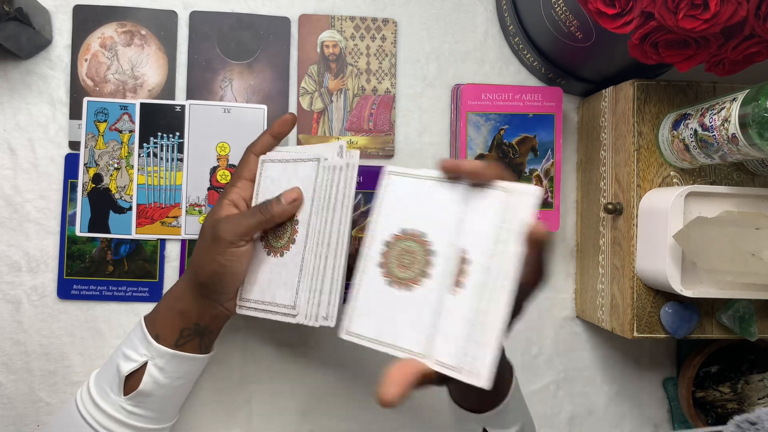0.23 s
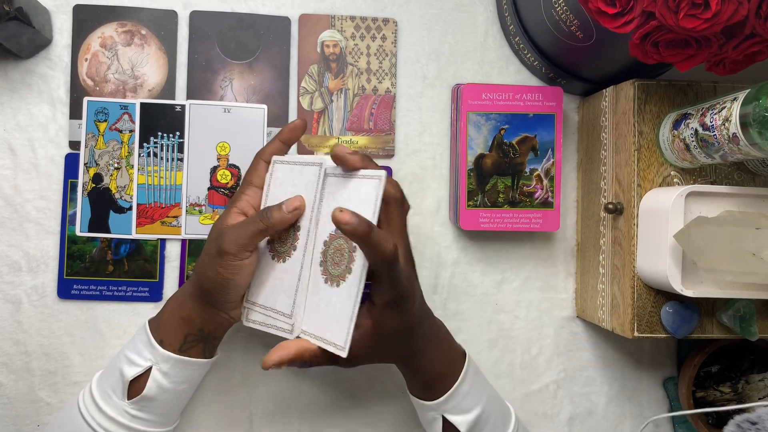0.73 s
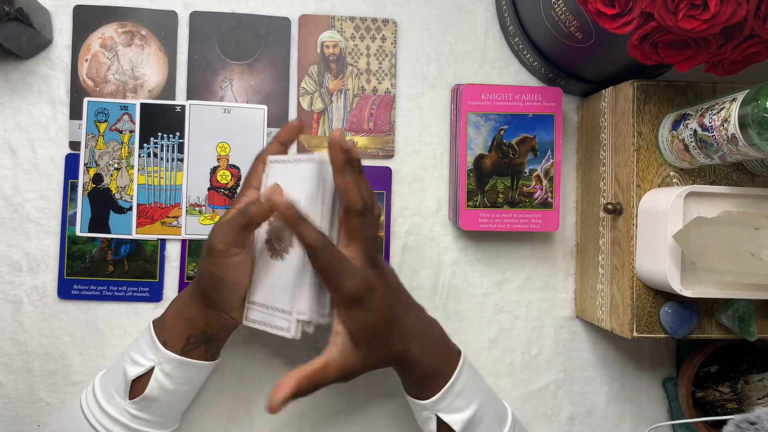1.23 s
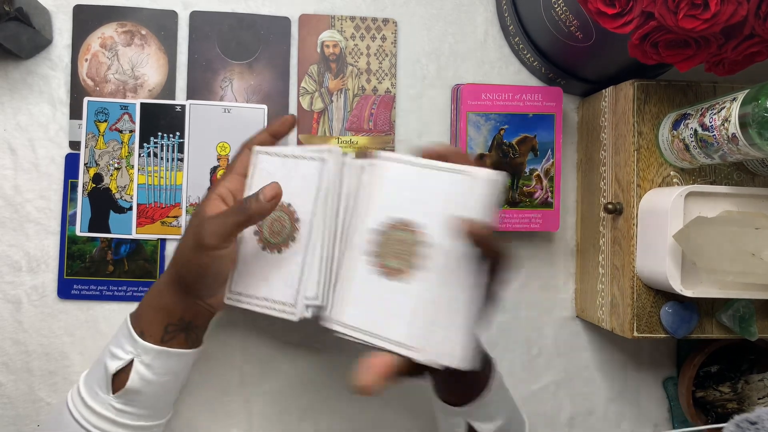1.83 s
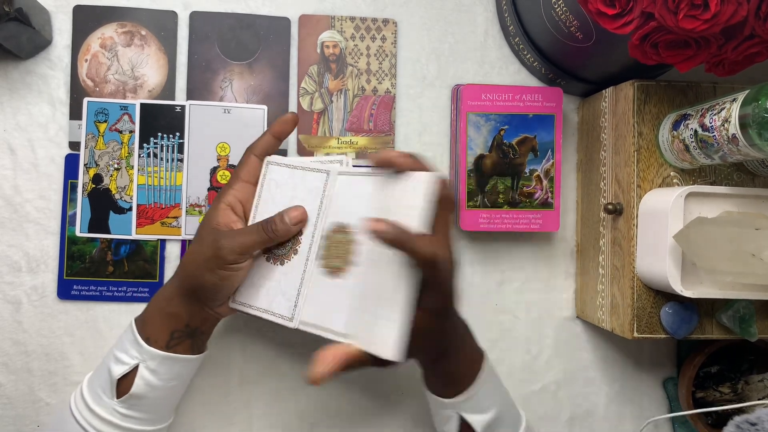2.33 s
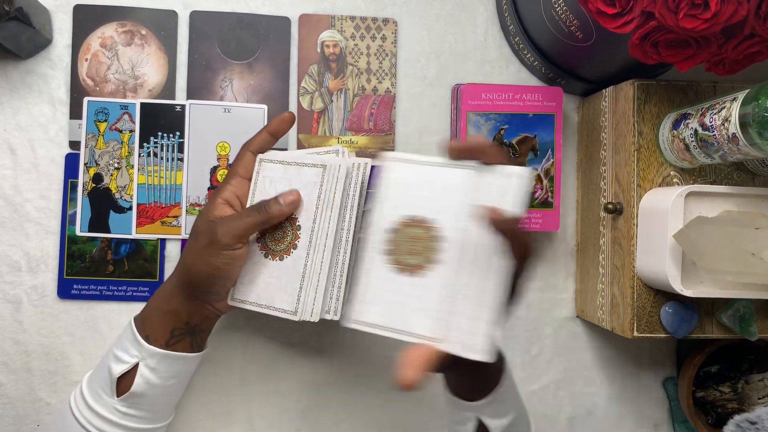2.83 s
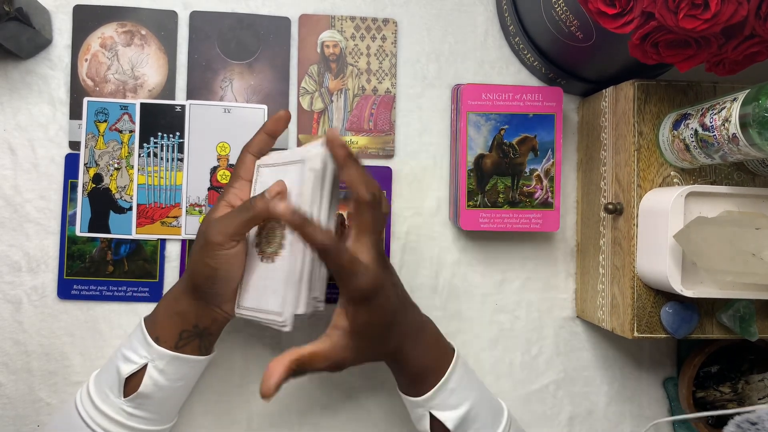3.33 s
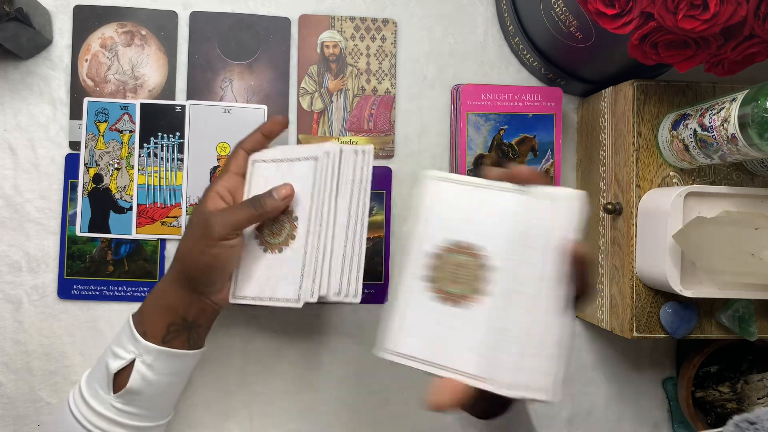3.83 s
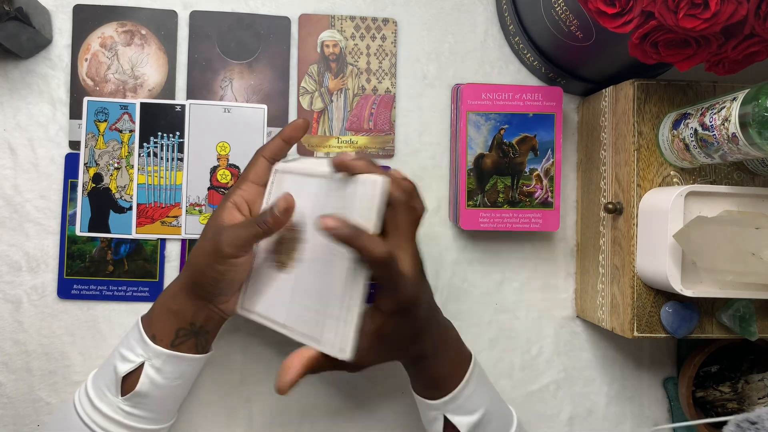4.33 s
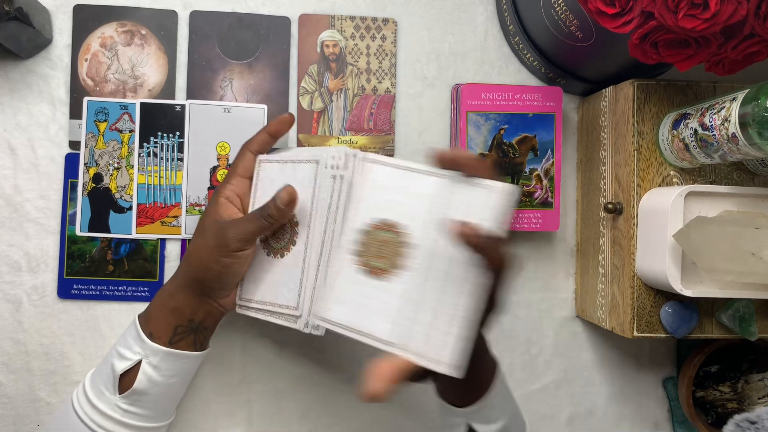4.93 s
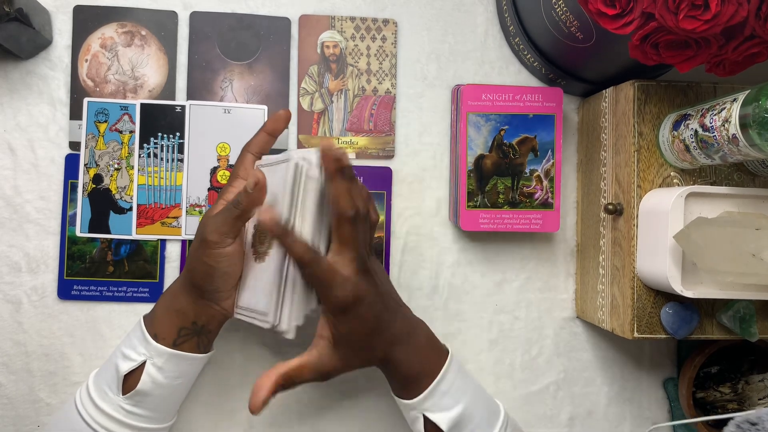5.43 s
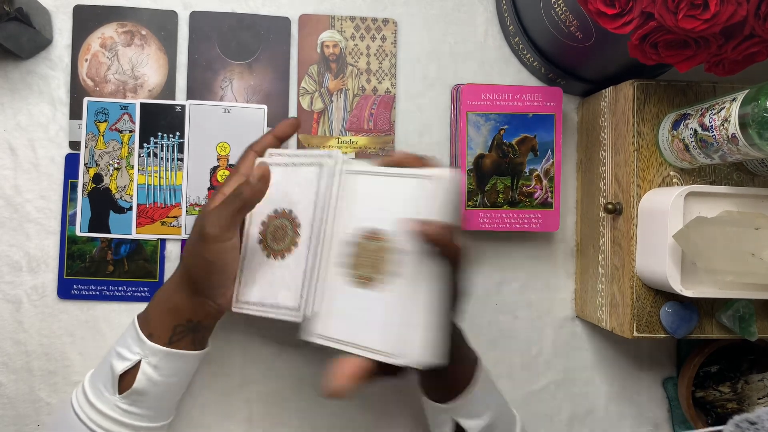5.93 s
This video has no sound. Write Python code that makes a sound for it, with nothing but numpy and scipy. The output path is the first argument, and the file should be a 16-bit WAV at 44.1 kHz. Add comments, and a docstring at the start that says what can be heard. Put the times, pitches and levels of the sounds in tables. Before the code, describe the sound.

One nearby microphone picks up hands shuffling stiff cards over a cloth-covered table. Crisp snaps and softer flicks come irregularly, a few strong ones standing out, with short papery rubbing as the cards are gathered and squared. Very soft low thumps come from the table. The room is quiet, with short reflections, a gentle steady rumble and a trace of electrical hum.

```python
"""A soft room rumble and a faint mains hum come first, then cards: a big deck is shuffled overhand above a cloth.
Packets clack against the deck: flattened clusters of contacts ring its resonances, with a dull puff and a crackle.
Faces slide over each other as filtered friction noise, and single edges flick and tick.
Now and then a nudge makes the table boom in decaying sines; short reflections put the cards in a quiet room."""
import sys
import numpy as np
from scipy import signal
from scipy.fft import rfft, irfft, next_fast_len
from scipy.io import wavfile
from scipy.ndimage import uniform_filter1d

SR = 44100
rng = np.random.default_rng(int(sys.argv[2]) if len(sys.argv) > 2 else 0)


def unload_wav(signal):
    """Save mono or channel-first audio to the path in sys.argv[1] as 16-bit WAV at rate SR, clipped to [-1, 1]."""
    wavfile.write(
        sys.argv[1],
        SR,
        np.round(np.clip(np.atleast_2d(signal).T, -1, 1) * 32767).astype(np.int16),
    )


N = 272538
TIME = np.arange(N) / SR


def from_db(db):
    """Decibels to gain."""
    return 10 ** (np.asarray(db) / 20)


def rms_one(x):
    """Scale to unit power."""
    return x / np.sqrt(np.mean(x ** 2) + 1e-20)


def add(track, start_s, sound):
    """Mix a sound into a track at a time."""
    at = max(round(start_s * SR), 0)
    track[at:at + len(sound)] += sound[:max(N - at, 0)]


def lowpass(x, order, hz):
    """Butterworth low-pass that dulls a sound."""
    return signal.sosfilt(signal.butter(order, hz, fs=SR, output="sos"), x)


def resonate(x, hz, width_hz):
    """Two-pole resonance with gain 1 on top; a wider one dies away sooner."""
    radius = np.exp(-np.pi * width_hz / SR)
    zeros = np.array([1, 0, -1]) * (1 - radius * radius) / 2
    poles = [1, -2 * radius * np.cos(2 * np.pi * hz / SR), radius * radius]
    return signal.lfilter(zeros, poles, x)


def colour(x, spectrum):
    """Minimum-phase filter through (pitch_hz, level_db) points, so that nothing sounds early."""
    size = next_fast_len(len(x) + 1024, True)
    hz, db = np.transpose(spectrum)
    grid = np.maximum(np.arange(size // 2 + 1) * SR / size, 1)
    gain = from_db(np.interp(np.log(grid), np.log(hz), db))
    # folding the cepstrum onto positive times makes the phase minimal
    cepstrum = irfft(np.log(gain), size)
    cepstrum[1:size // 2] *= 2
    cepstrum[size // 2 + 1:] = 0
    return irfft(rfft(x, size) * np.exp(rfft(cepstrum)), size)[:len(x)]


# spectral shape of the room's rumble and hiss: (pitch_hz, relative_density_db)
ROOM_TONE = [(20, -2), (42, -17), (60, 6.5), (95, -8), (160, -2.5), (290, 3.5), (430, -1.5), (650, -9.5),
             (1050, -15), (2500, -17), (4500, -21), (7500, -23), (11000, -29), (16000, -35.5)]
ROOM_TONE_DB = -57.5  # rms
# mains hum partials: (pitch_hz, level_db), levels rms
HUM = [(120, -73), (240, -67.5)]


def background():
    """Steady room rumble and hiss from coloured noise, with a faint mains hum of sines."""
    tone = rms_one(colour(rng.standard_normal(N), ROOM_TONE))
    hum = sum(from_db(db) * np.sqrt(2) * np.sin(2 * np.pi * (hz * TIME + rng.random())) for hz, db in HUM)
    return from_db(ROOM_TONE_DB) * tone + hum


def drift(knots_per_s):
    """Random wandering in straight lines between knots, scaled to unit power."""
    knots = rng.standard_normal(8192)
    return rms_one(np.interp(TIME * knots_per_s, np.arange(len(knots)), knots))


def friction(catches_per_s=450, catch_share=0.2, catch_vary_db=3.5, judder_db=3.0, judder_rate=170):
    """Card on card: a smooth hiss plus tiny catches, under an unsteady finger pressure."""
    sizes = from_db(catch_vary_db * np.minimum(rng.exponential(1, N), 4)) * rng.choice([-1, 1], N)
    catches = rms_one(sizes * (rng.random(N) < catches_per_s / SR))
    hiss = rng.standard_normal(N)
    return (hiss + catch_share * catches) * from_db(judder_db * drift(judder_rate))


def pressure(start, end, rise_s, fall_s):
    """The samples of one rub, and its finger pressure: attack, hold and release."""
    span = slice(max(round(start * SR), 0), round(max(end, start + .005) * SR))
    t = TIME[span]
    return span, np.clip(np.minimum((t - start) / rise_s, (end - t) / fall_s), 0, 1)


# overhand strokes, each a packet that lands, is dragged off the deck and lets go with a light flick:
# (landing_s, release_s, clack_db, thud_over_clack_db, crispness_over_clack_db, contact_spread_s,
#  table_bounce_lag_s, release_clack_db, drag_db), levels before the overall trims
STROKES = [(0.0534, 0.1277, -43.5, -4.5, -2.5, 0.006, 0.00024, -51.5, -61),
           (0.3736, 0.4725, -24, -13, -6.5, .0017, .00054, -51, -69),
           (.856, .887, -38, -2.5, -9, 0.0026, 0.001, -50, -73),
           (1.8568, 1.965, -40.5, -1, -16, 0.0017, .00025, -46.5, -58.5),
           (2.2078, 2.2874, -36, -9.5, -18, .0003, 0.00044, -54, -59),
           (2.5344, 2.641, -26.5, -4.5, -10, 0.00072, .00061, -45.5, -57),
           (2.8689, 2.9416, -30, -10, -7.5, 0.00076, 0.00065, -45, -56.5),
           (3.16, 3.214, -19.5, -21, -9, 0.0017, 0.0012, -45.5, -56.5),
           (3.95, 4.0444, -32.5, -8.5, -17, .00046, 0.00051, -48.5, -59.5),
           (4.2762, 4.3735, -35, -25, -12.5, 0.0015, .00051, -46.5, -61),
           (5.0231, 5.081, -39.5, -7.5, -10.5, 0.0023, 0.00034, -45, -61),
           (5.2739, 5.305, -31, -4, -7, .0028, 0.0012, -58, -52),
           (5.71, 5.732, -49.5, 3, -6, 0.0015, .0002, -44, -57),
           (5.9507, 6.0344, -38.5, 0, -4.5, 0.00031, .00047, -45, -68)]
# the packet skims the deck just before it lands and just after it lets go
SKIM_S, LINGER_S = 0.0086, 0.01
# the drag grows by this much towards the release
DRAG_GROWTH_DB, DRAG_TREBLE_DB, DRAG_RING_HZ = 3.5, 0.5, 1750
# card faces sliding while the deck is cut and squared:
# (start_s, end_s, level_db, treble_over_body_db, card_resonance_hz), levels before the overall trims
SLIDES = [(0.36, 0.386, -38.5, -23, 3920), (0.466, .487, -55, 5.5, 5700), (0.725, 0.794, -58, -6, 1700),
          (.846, 0.871, -53.5, -5.5, 1780), (0.995, 1.067, -55.5, -7, 7340), (1.069, 1.11, -51, -3.5, 5076),
          (1.105, 1.189, -49.5, -18, 3930), (1.235, 1.311, -63.5, 6.5, 5610), (1.311, 1.624, -69, 1, 7940),
          (1.482, 1.743, -65, -13, 2223), (2.281, 2.297, -48.5, -17, 3020), (3.266, 3.307, -60, 1, 7100),
          (3.361, 3.401, -55, 3.5, 7430), (3.4, 3.474, -59.5, 1.5, 5300), (3.526, 3.745, -67.5, 0, 7700),
          (3.924, 3.974, -54.5, -4, 3700), (4.315, 4.371, -49, -25, 1600), (4.588, 4.743, -58, -1.5, 1530),
          (4.965, 4.996, -51.5, -6, 6370), (5.187, 5.383, -55, -3, 1900), (5.426, 5.522, -61, 5.5, 5420),
          (5.541, 5.66, -70.5, 0, 6200), (5.64, 5.705, -61.5, 2.5, 5800), (5.698, 5.736, -51.5, 0.5, 7070),
          (5.877, 5.937, -55, -1, 2480), (5.935, 5.984, -50.5, -4, 1700)]
# every slide swells and fades over these shares of its length
SWELL_SHARE, FADE_SHARE = 0.18, 0.27
# spectral shape of the rub's body: (pitch_hz, relative_level_db)
RUB_BODY = [(120, -40), (350, -6.5), (900, 2), (1650, -5.5), (2400, 0.5), (3500, -2), (5000, -4),
            (8000, -21)]
# spectral shape of the rub's treble: (pitch_hz, relative_level_db)
RUB_TREBLE = [(2500, -11), (5000, 7), (6500, 7.5), (8300, 4.5), (10000, 0), (12500, 3), (16000, -44.5)]


def slides(rise_s=0.0035, fall_s=0.019, ring_gain=0.97, ring_width=0.32, body_db=-0.5, treble_db=-2.0):
    """Each drag or slide rubs for a moment and brings out a broad resonance of the sliding card."""
    out, force = np.zeros(N), friction()
    body = from_db(body_db) * rms_one(colour(force, RUB_BODY))
    treble = from_db(treble_db) * rms_one(colour(force, RUB_TREBLE))

    def rub(span, bright_db, hz):
        """Body and treble of the friction, with the card's resonance on top."""
        sound = body[span] + from_db(bright_db) * treble[span]
        return sound + ring_gain * resonate(sound, hz, ring_width * hz)

    for landing, release, *_, drag_db in STROKES:
        span, press = pressure(landing - SKIM_S, release + LINGER_S, rise_s, fall_s)
        growth_db = DRAG_GROWTH_DB * np.linspace(-.5, .5, len(press))
        out[span] += from_db(drag_db + growth_db) * press * rub(span, DRAG_TREBLE_DB, DRAG_RING_HZ)
    for start, end, db, bright_db, hz in SLIDES:
        length_s = end - start
        span, press = pressure(start, end, SWELL_SHARE * length_s, FADE_SHARE * length_s)
        out[span] += from_db(db) * press * rub(span, bright_db, hz)
    return out


def flatten(contacts, smooth_bins=25):
    """Many tiny contacts together excite all pitches about evenly."""
    power = uniform_filter1d(np.abs(rfft(contacts)) ** 2, smooth_bins)
    inverse_db = -10 * np.log10(power + 1e-12)
    return colour(contacts, np.transpose([np.linspace(1, SR / 2, len(power)), inverse_db]))


def unit_click(x, click_s=.006):
    """Scale a click to unit power over its first milliseconds."""
    return x / (x[:round(click_s * SR)].std() + 1e-12)


# resonances of the hand-held deck before the grip shifts them: (pitch_hz, width_hz, relative_level_db)
DECK = [(715, 540, -15), (1505, 400, 6.5), (2030, 690, 3), (2840, 1300, 1.5), (4120, 880, -0.5),
        (5200, 1830, -13.5)]
# spectral shape of the edge crackle: (pitch_hz, relative_level_db)
EDGE = [(2500, -60), (4800, 1.5), (7500, -1), (10000, -11), (13000, -15), (16000, -19)]


def snap(clack_db, thud_db, crisp_db, spread_s, scatter=0.33, lowest_thud_hz=380, thud_width_hz=380,
         crackle_s=0.001, hardening=0.52, usual_crisp_db=-7.0):
    """The first card lands, the rest follow in a quick cluster; the deck rings briefly."""
    t = TIME[:2048]
    contacts = scatter * rng.standard_normal(len(t)) * np.exp(-t / max(spread_s, 1e-4))
    contacts[0] += 1
    contacts = flatten(contacts)
    # the grip shifts the resonances a little each time; a crisp landing favours the upper ones
    grip = rng.normal(0, [.02, 1], (len(DECK), 2))  # share of the pitch, dB
    tilt_db_per_octave = hardening * (crisp_db - usual_crisp_db)
    clack = np.zeros(len(t))
    for k, (hz, width_hz, db) in enumerate(DECK):
        gain = from_db(db + grip[k, 1] + tilt_db_per_octave * np.log2(hz / DECK[0][0]))
        clack += (-1) ** k * gain * resonate(contacts, hz * (1 + grip[k, 0]), width_hz)
    # paper is soft: it rounds off the very top
    clack = lowpass(clack, 2, SR / 4)
    # air squeezed from between the cards gives a dull puff
    puff = lowpass(contacts, 2, 2 * lowest_thud_hz)
    thud = resonate(puff, lowest_thud_hz * rng.uniform(1.0, 1.38), thud_width_hz)
    crackle = colour(rng.standard_normal(len(t)) * np.exp(-t / (crackle_s + spread_s / 2)), EDGE)
    mix = unit_click(clack) + from_db(thud_db) * unit_click(thud) + from_db(crisp_db) * unit_click(crackle)
    return from_db(clack_db) * mix


# single cards flicking against the deck, and at 5.29 s a further packet landing: # (start_s, clack_db,
# thud_over_clack_db, crispness_over_clack_db), clack before the overall trim
FLICKS = [(.0697, -48, -25, -2), (.1861, -55, 5, -12), (.3599, -39, -16, -0.5), (.3672, -40, -5, -10),
          (.572, -52, -1.5, -25), (.6254, -46, -0.5, -12), (.6351, -49, 2.5, -6), (.6904, -44, -20, -18),
          (.7555, -47.5, -7, -14), (1.1301, -48, 7, -1), (1.165, -51, 0, -11), (1.2523, -49, -27, 1.5),
          (1.5867, -46.5, 9, -6.5), (1.8854, -42.5, -7, -12), (1.917, -44, 0, -4), (2.2168, -40, -5, -4.5),
          (2.2362, -44, -4, -19), (2.5572, -42.5, -5.5, -12), (2.8973, -51.5, 4, 4), (2.9146, -51, 0, 6),
          (2.9266, -40.5, -3, -5), (3.6942, -47, 3, -3), (3.9439, -43.5, 0.5, -5),
          (3.9554, -39.5, -3.5, -4.5), (4.0312, -36.5, -24, -8.5), (4.2863, -43, -0.5, -7),
          (4.3479, -41.5, -14, -5), (4.6878, -45, -2, -10), (4.7293, -54, 10, -1.5),
          (5.2073, -42, -2.5, -11), (5.2586, -38, -11, -3.5), (5.2909, -30, -7.5, -2.5),
          (5.4317, -46.5, -32, -3.5), (5.446, -46, -24, -9), (5.717, -39, -3.5, 1), (5.89, -52, 12, -20),
          (5.9588, -37.5, -8, -23)]
# thud and crispness of ticks and releases, over their clack
LIGHT_THUD_DB, LIGHT_CRISP_DB = -1.5, -5.5
# stray edges tick at random under drags and slides
TICKS_PER_S, TICK_VARY_DB = 45, 3
TICK_OVER_DRAG_DB, TICK_OVER_SLIDE_DB = 2.5, -3
CARD_SPREAD_S = 0.0027
# single cards meet the deck anywhere along its edge, so the lag of their bounce varies
CARD_BOUNCE_S, CARD_BOUNCE_VARY = .00042, 0.28  # median, spread of its logarithm


def contacts_of_cards():
    """All edge contacts: (start_s, clack_db, thud_db, crispness_db, spread_s, bounce_lag_s)."""
    packets = [(landing, *slap) for landing, _, *slap, _, _ in STROKES]
    releases = [(release, db, LIGHT_THUD_DB, LIGHT_CRISP_DB) for _, release, *_, db, _ in STROKES]
    cards = FLICKS + releases
    # stray edges tick wherever cards rub
    rubs = [(landing, release, drag_db + TICK_OVER_DRAG_DB) for landing, release, *_, drag_db in STROKES]
    rubs += [(start, end, db + TICK_OVER_SLIDE_DB) for start, end, db, *_ in SLIDES]
    for start, end, db in rubs:
        waits, sizes = rng.exponential(size=16), rng.standard_normal(size=16)
        for tick_s, size in zip(start + np.cumsum(waits) / TICKS_PER_S, sizes):
            if tick_s < end:
                cards.append((tick_s, db + TICK_VARY_DB * size, LIGHT_THUD_DB, LIGHT_CRISP_DB))
    lags = CARD_BOUNCE_S * np.exp(CARD_BOUNCE_VARY * rng.standard_normal(size=512))
    return packets + [(*card, CARD_SPREAD_S, lag) for card, lag in zip(cards, lags)]


def snaps(bounce=0.4, cloth_hz=6000, level_db=-2.0, brush_s=0.0009, brush_db=-12.5):
    """Every landing of a card edge, and its later, duller bounce off the cloth below the hands."""
    direct, bounced = np.zeros(N), np.zeros(N)
    for start_s, clack_db, thud_db, crisp_db, spread_s, lag_s in contacts_of_cards():
        sound = from_db(level_db) * snap(clack_db, thud_db, crisp_db, spread_s)
        add(direct, start_s, sound)
        # a corner brushes the deck just before the whole edge lands
        add(direct, start_s - brush_s, snap(clack_db + brush_db, thud_db, crisp_db, spread_s))
        add(bounced, start_s + lag_s, bounce * sound)
    return direct, lowpass(bounced, 1, cloth_hz)


def room(x, early_db=-14.5, early_s=0.027, tail_db=-16.5, t60_s=0.37, first_wall_s=0.016, build_s=0.015,
         low_hz=1400, wall_hz=7500):
    """Quick scatter from things on the table, then a short tail; small cards radiate little bass into the room."""
    t = TIME[:SR // 2]
    early = rng.standard_normal(len(t)) * np.exp(-t / early_s) * (t > .002)
    build = np.clip((t - first_wall_s) / build_s, 0, 1)
    tail = rng.standard_normal(len(t)) * from_db(-60 * t / t60_s) * build
    band = signal.butter(1, [low_hz, wall_hz], "band", fs=SR, output="sos")
    tail = signal.sosfilt(band, tail / np.linalg.norm(tail))
    response = from_db(early_db) * early / np.linalg.norm(early) + from_db(tail_db) * tail
    return signal.fftconvolve(x, response)[:N]


# nudges of the table: (start_s, level_db), level before the resonances' own
NUDGES = [(0.623, -50), (2.028, -59), (3.474, -49.5), (3.6, -54), (3.915, -60.5), (4.152, -57.5),
          (5.434, -55), (5.55, -48.5), (5.918, -51)]
# resonances of the table, each pitch varied slightly per nudge: (pitch_hz, t60_s, relative_level_db)
TABLE = [(73.2, 0.46, 4), (83, 0.14, 3), (150, 0.069, 7)]


def table():
    """A soft push sets the table booming faintly: decaying sines with a rounded onset."""
    out, t = np.zeros(N), TIME[:SR]
    for start_s, level_db in NUDGES:
        boom = np.zeros(len(t))
        for hz, t60_s, db in TABLE:
            varied_hz = hz * (1 + 0.017 * rng.normal())
            boom += from_db(db - 60 * t / t60_s) * np.sin(2 * np.pi * varied_hz * t)
        onset = 1 - np.exp(-t / 0.0078)
        add(out, start_s, from_db(level_db) * boom * onset)
    return out


def scene():
    """Cards close to one microphone, in the room, over the table and the background."""
    behind, rubbing = table() + background(), slides()
    direct, bounced = snaps()
    cards = direct + rubbing
    return (cards + bounced + room(cards) + behind)[None]


def record(dry, cutoff_hz=15800):
    """A steep elliptic low-pass takes off the very top."""
    return signal.sosfilt(signal.ellip(10, .1, 80, cutoff_hz, fs=SR, output="sos"), dry)


dry = scene()
out = record(dry)
unload_wav(out)
```